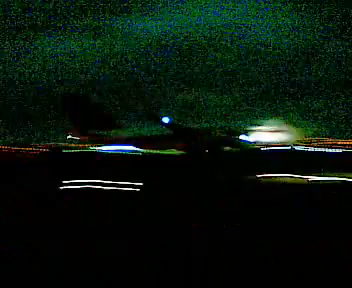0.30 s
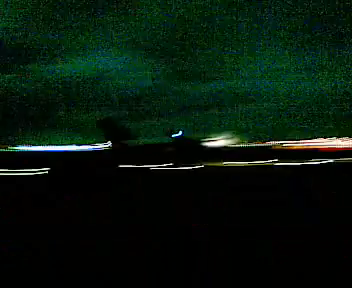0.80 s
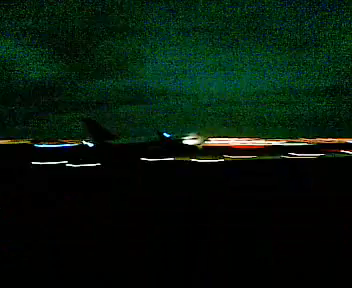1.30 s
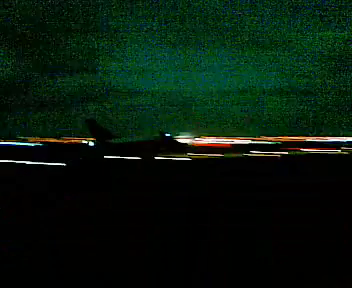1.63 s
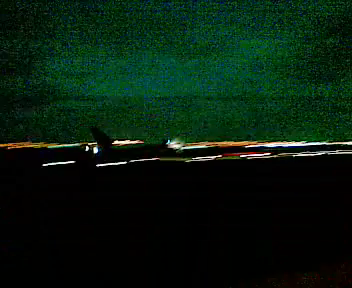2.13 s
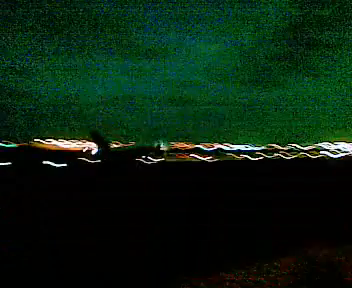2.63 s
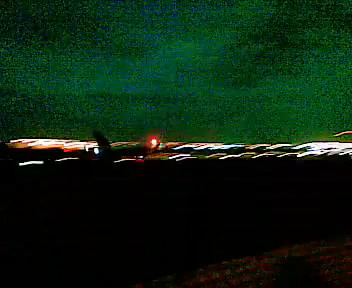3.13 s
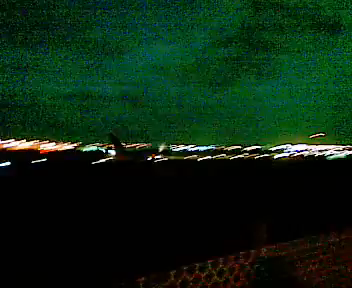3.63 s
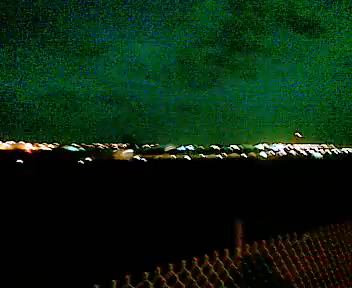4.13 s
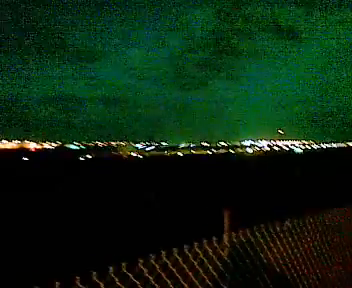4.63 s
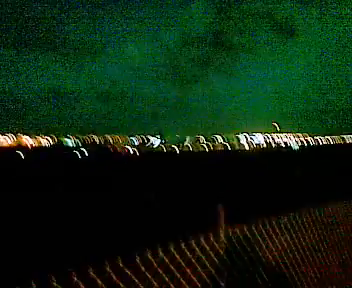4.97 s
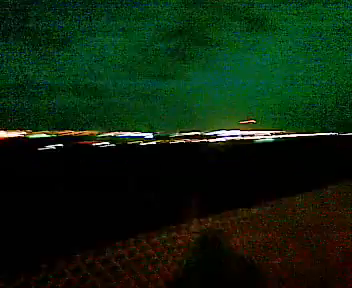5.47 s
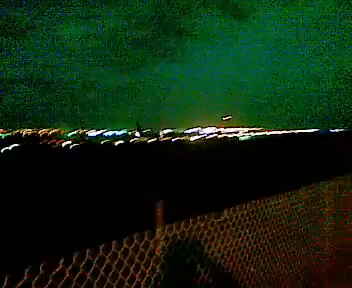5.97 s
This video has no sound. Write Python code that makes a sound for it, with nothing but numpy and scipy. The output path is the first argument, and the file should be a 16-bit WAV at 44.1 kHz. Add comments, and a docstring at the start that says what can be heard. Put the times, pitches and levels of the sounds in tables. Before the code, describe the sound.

Low, lumpy wind buffeting and soft thumps dominate the opening, over a jet's rushing roar. The fan whine emerges in uneven swells, strongest from about two to three and a half seconds, steadily sinking in pitch. As the aircraft recedes, its hiss fades, leaving a duller, weaker roar, occasional wind bumps and faint airfield rumble, through a band-limited outdoor microphone with little top end.

```python
"""A four-engine jet airliner rolls past on a runway, heard from beside the airport fence.
At first wind buffets the microphone under a broad roar and high fan whine; soon soft thumps join in.
After two seconds the steady wind fades to light airs. At three seconds the airliner is level with us.
The whine slides down in pitch throughout, and the roar turns duller and weaker as the tail comes round.
Roar is shaped noise, whine is wavering tones, wind is lumpy noise; a low airfield rumble lies beneath."""
import sys
import numpy as np
from scipy import signal
from scipy.io import wavfile
from scipy.ndimage import uniform_filter1d

SR = 44100
rng = np.random.default_rng(int(sys.argv[2]) if len(sys.argv) > 2 else 0)


def materialize(psi):
    """Save the field psi as 16-bit PCM at rate SR to the path in sys.argv[1].

    A 1-D psi becomes a single channel; in a 2-D psi each row is a channel.
    """
    bounded = np.clip(np.atleast_2d(psi).T, -1, 1)
    quanta = np.round(bounded * 32767).astype(np.int16)
    wavfile.write(sys.argv[1], SR, quanta)


N = 276948
TIME = np.arange(N) / SR  # seconds

# The roar. Where the airliner points: start_s, bearing (0 nose towards us, 1 side on, 2 tail towards us)
BEARING = [(0, 0), (1.4, -0.54), (2.4, 0.5), (3.0, 1), (3.4, 1.5), (4.0, 1.8), (6.28, 3)]
# overall strength of the roar: start_s, level_db
ROAR_LEVEL = [(0.1, -42.5), (0.6, -39.5), (1.6, -39), (2.3, -39.5), (2.8, -39), (3.35, -40.5), (3.9, -44),
              (4.6, -42.5), (5.25, -48), (5.7, -43.5), (6.2, -42.5)]
# strength of its parts, added to that level; rows ahead, side, behind: low_db, middle_db, hiss_db
ROAR_BALANCE = [(-2, -1, -4.5), (-2, -1.5, -9), (-2, -3.5, -16)]
# where the low part meets the middle, and the middle meets the hiss: pitch_hz
CROSSOVER_HZ = (1250, 3200)
# colour of the roar from ahead, side and behind: pitch_hz, relative_db_per_hz
COLOUR_AHEAD = [(170, 5), (290, -7), (550, 5.5), (800, -0.5), (1300, -7), (2000, 0.5), (2600, -1),
                (3300, -15), (4250, -10), (5200, -18.5), (6300, -13), (7400, -29.5)]
COLOUR_SIDE = [(170, -4), (330, -6), (550, 3.5), (850, 0), (1300, -6), (2000, 1.5), (2450, -0.5),
               (3100, -15), (4000, -8.5), (5200, -20), (6300, -15), (7400, -35.5)]
COLOUR_BEHIND = [(170, -14), (300, -17.5), (620, -3.5), (850, -8), (1200, -10.5), (1850, -1.5), (2450, -4),
                 (3250, -18), (4500, -8.5), (5400, -18), (6400, -22.5), (7400, -39)]
# peaks and dips from nearby reflections, in the same three directions: pitch_hz, width_hz, lift_db
RIPPLE_AHEAD = [(685, 180, 5.5), (1120, 220, 1), (1333, 185, 8), (1650, 490, -4.5), (1917, 140, 3.5),
                (2177, 31, -9), (3500, 350, -1.5), (4320, 500, 2), (5500, 240, 1.5), (5900, 180, -4.5)]
RIPPLE_SIDE = [(844, 44, 5.5), (1063, 240, -7.5), (1148, 180, 8.5), (1530, 200, -4.5), (1787, 120, 4),
               (2450, 62, -2.5), (2480, 120, -3.5), (3260, 160, 1), (3930, 280, 3), (6300, 370, 6.5)]
RIPPLE_BEHIND = [(890, 120, 7), (1005, 400, -8), (1460, 120, 1), (1607, 200, -5.5), (1954, 96, -3.5),
                 (3160, 86, 4), (5770, 400, 1.5), (6510, 800, 10.5)]
# moving air carries the sound over in swells: middle_s, length_s, roar_lift_db (before its share), whine_lift_db
SWELLS = [(0.38, 0.18, 5.5, 0), (1.19, 0.14, 1.5, 1), (1.765, 0.1, 5, -3), (1.9, 0.12, 2.5, 2.5),
          (2.005, 0.13, 4, 13.5), (2.44, 0.25, 2.5, 3), (3.045, 0.22, 10.5, 14), (3.585, 0.18, 4.5, 4),
          (4.08, 0.098, 3, 2)]
# share of the roar's lift that each part takes: low, middle, hiss (ratios)
SWELL_SHARES = (0.51, 0.74, 0.89)

# The fans. Tones: multiple of the blade-passing pitch, level_db (added to the whine), width_hz
FAN_TONES = [(1, -2.7, 18), (1.002, -11, 48), (.5, -17.5, 16), (2, -27, 49)]
# strength of the whine, before the swells lift it: start_s, level_db
WHINE = [(0, -66), (0.35, -53), (0.55, -55), (0.8, -43), (0.95, -47), (1.05, -55), (1.17, -50), (1.35, -53),
         (1.52, -44.5), (1.75, -50), (1.93, -42), (2.15, -42), (2.28, -38.5), (2.36, -48), (2.47, -43),
         (2.58, -50), (2.75, -48), (2.87, -52), (3.1, -44), (3.27, -47), (3.42, -36.5), (3.68, -40.5),
         (3.79, -51), (4.03, -46), (4.2, -50), (4.37, -45), (4.55, -58), (5.2, -64), (5.6, -48.5),
         (6.28, -48)]
# how clean the whine is: start_s, core (steady part over scattered part)
CORE = [(0.8, 3), (1.6, 2.3), (2.0, 3.1), (2.4, 1.9), (3.1, 2.4), (3.5, 2.5), (3.9, 2.2), (4.35, 3),
        (5.6, 2.1)]
# strength of the whine from one slower engine: start_s, level_db
SLOW_WHINE = [(0, -55), (0.45, -46.5), (0.8, -46.5), (1.15, -47), (1.65, -57), (1.89, -38), (2.02, -42.5),
              (2.15, -60), (2.75, -57), (3.08, -43.5), (3.3, -54), (3.8, -71)]
SLOW_FAN_RATIO = 0.907  # its pitch as a share of the others'
# breathy whistles: middle_s, length_s, pitch_hz, width_hz, level_db, core (steady over scattered part)
WHISTLES = [(1.007, 0.39, 838, 110, -40, 0.53), (1.26, 0.022, 4190, 76, -43.5, 0.4),
            (4.056, 0.21, 2450, 170, -46, 0.35), (4.52, 0.054, 2210, 15, -46, 3),
            (6.25, 1.15, 2350, 110, -47.5, 0.2)]
# the pitch sinks along an S-curve (Doppler shift as the airliner passes and slows); pitch at its centre
BLADE_HZ, GLIDE_CENTRE_S, GLIDE_DEPTH, GLIDE_SCALE_S = 2025, 3.617, 0.339, 2.172

# The wind. Short gusts: middle_s, length_s, level_db, speed (of the eddies, as a ratio)
BUFFETS = [(0.049, 0.019, -26.5, 0.74), (0.088, 0.015, -24.5, 1.14), (0.122, 0.019, -28, 0.62),
           (0.176, 0.016, -29.5, 1.1), (0.215, 0.027, -27.5, 0.8), (0.294, 0.018, -26.5, 1.07),
           (0.374, 0.046, -30, 1.3), (0.443, 0.031, -27.5, 1), (0.475, 0.017, -28, 0.46),
           (0.528, 0.023, -28.5, 0.72), (0.59, 0.017, -28.5, 0.9), (0.631, 0.03, -25.5, 1.14),
           (0.667, 0.015, -23, 1.17), (0.697, 0.024, -25.5, 0.65), (0.744, 0.014, -26.5, 0.55),
           (0.82, 0.014, -29, 0.74), (0.864, 0.018, -32, 0.54), (0.933, 0.046, -31, 1.1),
           (1.034, 0.052, -31.5, 0.7), (1.085, 0.021, -28, 1.2), (1.13, 0.011, -22, 1.2),
           (1.171, 0.036, -25, 1.45), (1.192, 0.009, -27, 0.75), (1.249, 0.04, -28, 1.05),
           (1.333, 0.01, -26.5, 1.1), (1.36, 0.028, -28, 1.05), (1.42, 0.03, -30, 1),
           (1.5, 0.017, -30.5, 0.93), (1.546, 0.048, -31.5, 0.99), (1.593, 0.013, -33, 0.89),
           (1.687, 0.016, -34.5, 1.1), (1.809, 0.024, -24.5, 0.67), (1.864, 0.038, -28.5, 1.12),
           (1.917, 0.022, -25, 1.3), (1.974, 0.018, -29, 0.82), (2.054, 0.023, -35, 0.57),
           (2.237, 0.019, -26, 0.83), (2.368, 0.015, -27, 0.7), (2.943, 0.051, -33, 0.79),
           (3.31, 0.03, -33.5, 0.62), (3.359, 0.015, -29.5, 0.49), (3.424, 0.026, -33.5, 0.82),
           (3.463, 0.021, -25, 1.3), (3.555, 0.02, -23.5, 1), (3.584, 0.016, -21.5, 1.6),
           (3.611, 0.02, -23, 1.3), (3.65, 0.053, -28, 1.1), (3.872, 0.063, -33.5, 0.7),
           (4.077, 0.088, -43, 0.31), (4.182, 0.046, -38, 0.65), (4.36, 0.018, -33.5, 0.53),
           (4.401, 0.036, -33, 0.62), (4.705, 0.042, -29, 0.5), (4.794, 0.027, -35, 0.63),
           (4.833, 0.021, -27, 0.76), (4.903, 0.042, -32, 0.81), (4.958, 0.012, -24, 0.62),
           (4.993, 0.014, -23, 0.97), (5.032, 0.047, -31, 0.53), (5.447, 0.018, -36.5, 0.21),
           (6.05, 0.068, -40.5, 0.37), (6.179, 0.015, -27.5, 0.7), (6.267, 0.018, -27.5, 0.8)]
# colour of a buffet at speed 1: pitch_hz, relative_db_per_hz
BUFFET_COLOUR = [(15, -17.5), (40, -14.5), (85, -1), (200, 0), (350, -3.5), (550, -13), (850, -24.5),
                 (1400, -44.5), (3000, -54), (7000, -70)]
# steady flow over the microphone: start_s, level_db
BREEZE = [(0.0, -26.5), (0.3, -29), (0.7, -30), (0.78, -35), (1.5, -35.5), (2.05, -41), (2.7, -50),
          (3.2, -40.5), (4.0, -45.5), (4.95, -41.5), (5.22, -59), (5.45, -52), (5.9, -46.5), (6.28, -46)]
# colour of the breeze at speed 1: pitch_hz, relative_db_per_hz
BREEZE_COLOUR = [(15, -10.5), (40, -11), (85, -0.5), (200, 0), (330, -6), (550, -10.5), (850, -16.5),
                 (1400, -36.5), (3000, -52), (7000, -65)]
WIND_DB_PER_OCTAVE = 14  # the flow must gain this much to double the speed of its eddies
# lone eddies that thump on the microphone: middle_s, peak_db, pitch_hz
THUMPS = [(0.821, -18.5, 260), (1.086, -17.5, 500), (1.122, -14.5, 380), (1.183, -16, 500),
          (1.193, -16.5, 570), (1.875, -21, 486), (2.362, -21.5, 380), (3.308, -27, 221), (3.509, -22, 237),
          (3.565, -22.5, 221), (3.593, -16, 500), (3.616, -12.5, 284), (3.852, -19.5, 316),
          (3.879, -26, 404), (4.167, -24, 334), (4.398, -23.5, 300), (4.702, -22.5, 221),
          (4.834, -21.5, 410), (4.902, -24, 447), (4.982, -23, 398), (4.996, -27, 450)]
THUMP_CYCLES = 0.42  # half-length of a thump, in cycles of its pitch

# The background. Colour of the far airfield rumble: pitch_hz, relative_db_per_hz
RUMBLE = [(20, -11.5), (55, 6.5), (92, 7.5), (140, -12.5), (220, -17.5), (400, -29.5), (900, -49.5)]
RUMBLE_DB = -50
CUTOFF_HZ = 7450  # top of the recorder's range


def roar(swell_db, flutter_db=0.41, patchy_db=1.73):
    """Engine noise turns its colour with the bearing; swells lift the hiss most and the air adds flutter."""
    level_db, = in_time(ROAR_LEVEL)
    bearing = np.clip(in_time(BEARING)[0], 0, 2)
    sides = [(COLOUR_AHEAD, RIPPLE_AHEAD), (COLOUR_SIDE, RIPPLE_SIDE), (COLOUR_BEHIND, RIPPLE_BEHIND)]
    out = 0
    for k, (colour, ripple) in enumerate(sides):
        # fade from one direction to the next
        share = np.maximum(1 - np.abs(bearing - k), 0)
        levels_db = [level_db + part_db + swell_share * swell_db
                     for part_db, swell_share in zip(ROAR_BALANCE[k], SWELL_SHARES)]
        out = out + np.sqrt(share) * exhaust(colour, ripple, levels_db, patchy_db)
    return out * from_db(flutter_db * drift(6.3))


def exhaust(colour, ripple, levels_db, patchy_db):
    """Turbulent noise from one side of the engines; low, middle and hiss follow their own levels."""
    hz, width, bands = noise_bands(np.geomspace(150, 8200, 29))
    rest = 0
    for f, w, band in zip(hz, width, bands):
        band_db = at_hz(colour, f) + patchy_db * drift(4.84)
        rest = rest + from_db(band_db) * np.sqrt(w) * band
    for peak_hz, width_hz, lift_db in ripple:
        rest = peak_filter(rest, peak_hz, width_hz, lift_db)
    parts = []
    for edge_hz in CROSSOVER_HZ:
        # split off what lies below the edge, then go on with what lies above it
        low, rest = [signal.sosfilt(signal.butter(5, edge_hz, kind, fs=SR, output="sos"), rest)
                     for kind in ("low", "high")]
        parts.append(low)
    parts.append(rest)
    return sum(from_db(db) * rms_one(part) for db, part in zip(levels_db, parts))


def peak_filter(x, hz, width_hz, db):
    """Lift or dip a narrow band, as a reflection does when it adds to or cancels the direct sound."""
    w, a = 2 * np.pi * hz / SR, from_db(db / 2)
    half = np.sin(w) * width_hz / (2 * hz)
    top = [1 + half * a, -2 * np.cos(w), 1 - half * a]
    bottom = [1 + half / a, -2 * np.cos(w), 1 - half / a]
    return signal.lfilter(top, bottom, x)


def fans(swell_db, flutter_db=0.5):
    """Blade tones sink as the airliner passes; distance and the exhaust scatter them."""
    past_s = TIME - GLIDE_CENTRE_S
    blade_hz = BLADE_HZ / (1 + GLIDE_DEPTH * past_s / np.hypot(past_s, GLIDE_SCALE_S))
    whine_db = in_time(WHINE)[0] + swell_db + flutter_db * drift(10.0)
    core, = in_time(CORE)
    whine = sum(blade_tone(multiple * blade_hz, whine_db + db, width_hz, core)
                for multiple, db, width_hz in FAN_TONES)
    slow_db, = in_time(SLOW_WHINE)
    slower = blade_tone(SLOW_FAN_RATIO * blade_hz, slow_db, width_hz=46, steady=0.29)
    return whine + slower + whistles()


def whistles():
    """Narrow, wavering tones come and go in the engine noise."""
    out = 0
    for s, length, hz, width_hz, db, steady in WHISTLES:
        out = out + np.sqrt(bump(s, length)) * blade_tone(hz, db, width_hz, steady)
    return out


def blade_tone(hz, db, width_hz, steady, waver=0.00186):
    """A tone with a steady core and a part that turbulence scatters into a narrow band."""
    phase = 2 * np.pi * np.cumsum(hz * (1 + waver * drift(17.0))) / SR
    tone = (steady + drift(width_hz)) * np.sin(phase) + drift(width_hz) * np.cos(phase)
    return from_db(db) * rms_one(tone)


def swells():
    """Moving air lifts the sound for moments: dB for the roar and for the whine at every sample."""
    return sum(np.outer([roar_db, whine_db], bump(s, length)) for s, length, roar_db, whine_db in SWELLS)


def buffets():
    """Short, dense gusts, each with an eddy speed of its own; where they overlap the stronger one leads."""
    powers = [from_db(db) ** 2 * bump(s, length, edge=2.08) + 1e-14 for s, length, db, _ in BUFFETS]
    power = sum(powers)
    speed = sum(p * row[-1] for p, row in zip(powers, BUFFETS)) / power
    return eddies(power, speed, BUFFET_COLOUR, lumpy_db=2.5, eddy_rate=142)


def thumps():
    """A lone eddy gives one rounded push and pull of pressure, either one first."""
    out = 0
    for (s, db, hz), sign in zip(THUMPS, rng.choice([-1, 1], len(THUMPS))):
        cycles = (TIME - s) * hz
        pulse = np.sin(2 * np.pi * cycles) / (1 + (cycles / THUMP_CYCLES) ** 2) ** 2
        out = out + sign * from_db(db) * pulse / pulse.max()
    return out


def breeze(gustiness_db=0.73, reference_db=-27.0):
    """A dull, rough flow; when it is stronger its eddies are faster and brighter."""
    flow_db = in_time(BREEZE)[0] + gustiness_db * drift(12)
    # the eddies have speed 1 at the reference strength
    speed = 2 ** ((flow_db - reference_db) / WIND_DB_PER_OCTAVE)
    return eddies(from_db(flow_db) ** 2, speed, BREEZE_COLOUR, lumpy_db=2.5, eddy_rate=91)


def eddies(power, speed, colour, lumpy_db, eddy_rate):
    """Turbulence at the microphone port comes in lumps, and the stronger lumps are brighter."""
    lumps_db = lumpy_db * drift(eddy_rate)
    speed = speed * 2 ** (lumps_db / 2 / WIND_DB_PER_OCTAVE)
    hz, width, bands = noise_bands(np.geomspace(16, 6000, 18))
    swirl = 0
    for f, w, band in zip(hz, width, bands):
        # faster eddies stretch the colour towards higher pitch
        swirl = swirl + from_db(at_hz(colour, f / speed)) * np.sqrt(w / speed) * band
    swirl = swirl * from_db(lumps_db)
    # even out the power over 1/45 s, so that the flow alone sets the mean strength
    local_power = uniform_filter1d(swirl ** 2, size=SR // 45)
    return np.sqrt(power) * swirl / np.sqrt(local_power + 1e-12)


def airfield():
    """A low, even rumble from far off, made of shaped noise."""
    hz, width, bands = noise_bands(np.geomspace(18, 900, 10))
    rumble = sum(from_db(at_hz(RUMBLE, f)) * np.sqrt(w) * band for f, w, band in zip(hz, width, bands))
    return from_db(RUMBLE_DB) * rms_one(rumble)


def from_db(db):
    """Turn decibels into gain."""
    return 10 ** (np.asarray(db) / 20)


def rms_one(x):
    """Scale a signal to an average power of 1."""
    return x / np.sqrt(np.mean(x ** 2) + 1e-20)


def in_time(rows):
    """Draw straight lines between a table's times, giving each column at every sample."""
    s, *columns = np.transpose(rows)
    return [np.interp(TIME, s, c) for c in columns]


def at_hz(points, hz):
    """Read a colour at any pitch, on a log-frequency axis."""
    points = np.array(points)
    return np.interp(np.log(hz), np.log(points[:, 0]), points[:, 1])


def drift(rate):
    """Smooth random wandering around 0, of spread 1, that changes at about the given rate in Hz."""
    # made at every 40th sample, then joined by straight lines; the first 2000 values let it settle
    r = np.exp(-80 * np.pi * rate / SR)
    slow = signal.lfilter([1], [1, -2 * r, r * r], rng.standard_normal(N // 40 + 2002))[2000:]
    return np.interp(np.arange(N) / 40, np.arange(len(slow)), rms_one(slow))


def noise_bands(edges):
    """Split noise into neighbouring bands of power 1: their centres, widths and signals."""
    # neighbours take turns between two noises; the extra half second lets the filters settle
    white = rng.standard_normal((2, N + SR // 2))
    bands = []
    for k, pair in enumerate(zip(edges, edges[1:])):
        band_filter = signal.butter(2, pair, "band", fs=SR, output="sos")
        bands.append(rms_one(signal.sosfilt(band_filter, white[k % 2])[-N:]))
    return np.sqrt(edges[1:] * edges[:-1]), np.diff(edges), bands


def bump(s, length, edge=2):
    """A rise and fall of height 1 around a moment; a larger edge makes the flanks steeper."""
    return np.exp(-np.pi / 4 * np.abs(2 * (TIME - s) / length) ** edge)


def scene():
    """The airliner over the airfield rumble, with wind close by, in one channel."""
    roar_swell_db, whine_swell_db = swells()
    airliner = roar(roar_swell_db) + fans(whine_swell_db)
    wind = buffets() + thumps() + breeze()
    return (airliner + wind + airfield())[None]


def record(dry):
    """The small recorder cuts the top steeply."""
    # order 12, 0.2 dB ripple below the cutoff, 80 dB down above it
    return signal.sosfilt(signal.ellip(12, .2, 80, CUTOFF_HZ, fs=SR, output="sos"), dry)


dry = scene()
out = record(dry)
materialize(out)
```